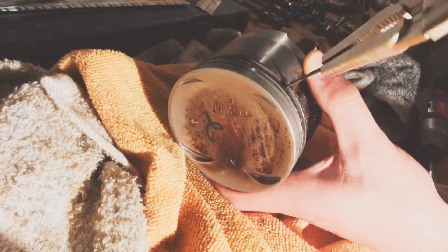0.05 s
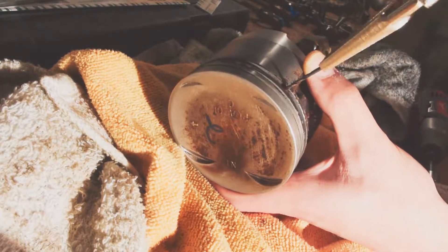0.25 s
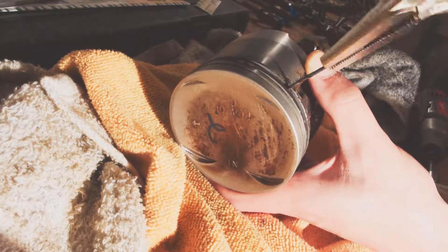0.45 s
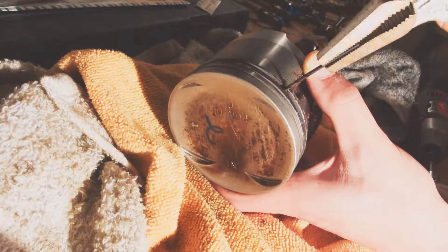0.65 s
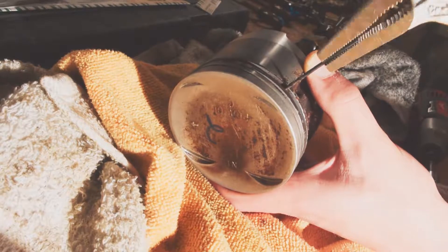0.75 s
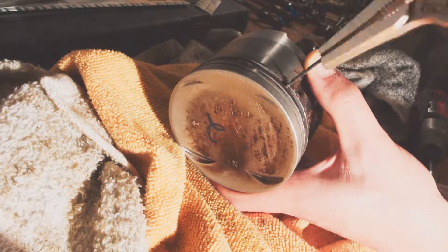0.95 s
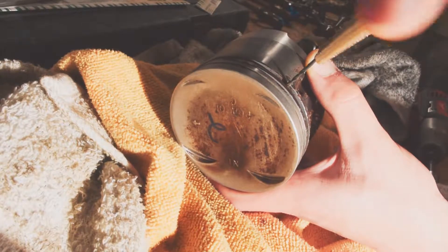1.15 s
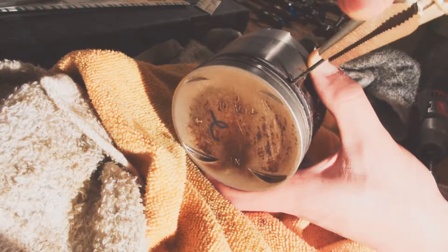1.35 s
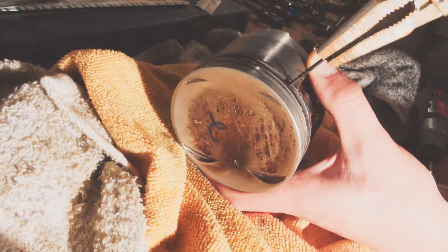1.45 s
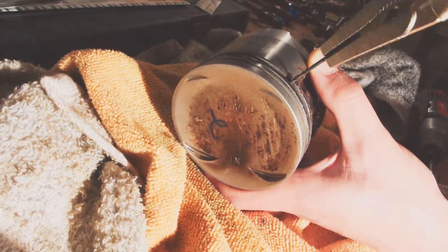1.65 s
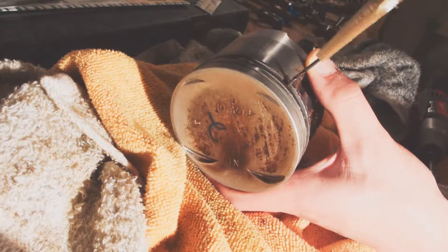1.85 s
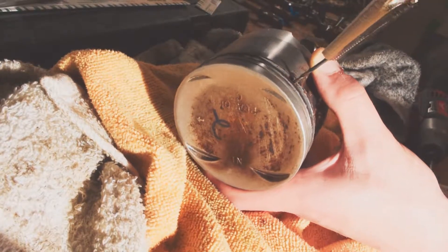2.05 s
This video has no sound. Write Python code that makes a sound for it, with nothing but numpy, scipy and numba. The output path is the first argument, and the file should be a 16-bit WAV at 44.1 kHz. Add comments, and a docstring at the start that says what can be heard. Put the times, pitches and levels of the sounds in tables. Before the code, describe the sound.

Small metal bit ticking and snapping against hard carbon, with short gritty scrapes.

```python
"""A small drill bit, gripped in pliers, is twisted by hand in the carbon-packed oil hole of a piston.
Its edges scrape, catch and snap free by stick-slip friction: each release rings the bit briefly,
cracks carbon and knocks the hand-damped piston. Hand and piston rustle softly on a towel.
A close microphone with a limiter hears it in a workshop with a faint tail, air noise and a low hum."""
import sys
import numpy as np
from scipy import signal
from scipy.fft import rfft, irfft
from scipy.io import wavfile
from scipy.ndimage import uniform_filter1d, minimum_filter1d
from numba import njit

SR = 44100
rng = np.random.default_rng(int(sys.argv[2]) if len(sys.argv) > 2 else 0)


def wav_out(sig):
    """Save sig, one row per channel (or a flat mono array), as 16-bit PCM at SR to the path in sys.argv[1]."""
    wavfile.write(sys.argv[1], SR, np.round(np.clip(np.atleast_2d(sig).T, -1, 1) * 32767).astype(np.int16))


N = 92610

# Air noise. Each row: frequency in Hz, relative density in dB.
AIR_SPECTRUM = [(20, -30), (35, -13), (55, -9), (85, -12), (150, -8), (250, -9), (500, -12.5),
                (1100, -16.5), (1800, -18.5), (6400, -21), (15500, -24)]
# Stereo width of the air. Each row: frequency in Hz, side against mid in dB.
AIR_WIDTH = [(50, -10), (150, -16.5), (600, -11.5), (3000, -7.5), (14000, -4.5)]
# Wavering of the low hum. Each row: time in seconds, level in dB.
HUM_LEVELS = [(0, -59), (.2, -67.5), (.36, -58.5), (.51, -54.5), (.64, -57.5), (.72, -61.5), (.81, -56),
              (.9, -62), (1.7, -65.5), (2.1, -59.5)]
# Two shifts of the hand, one curve each. Each point: time in seconds, level in dB.
GRIP_SHIFTS = [
    [(0, -45.5), (.03, -59), (.07, -64), (.12, -48.5), (.2, -73)],
    [(1.68, -77), (1.74, -56.5), (1.81, -62), (1.86, -78)],
]
# Their rustle. Each row: frequency in Hz, relative density in dB.
GRIP_SPECTRUM = [(40, -29), (90, 10.5), (170, 4), (380, 2), (600, -26.5), (1000, -9), (3000, -24)]
# Scraping, one curve for each twist. Each point: time in seconds, level in dB.
SCRAPE_STROKES = [
    [(0, -53), (.04, -56), (.08, -52.5), (.106, -47), (.122, -51)],
    [(.91, -72), (.945, -52.5), (.97, -43), (.982, -58.5), (1.025, -52.5), (1.06, -80)],
    [(1.16, -56), (1.198, -59.5), (1.222, -44.5), (1.252, -50), (1.272, -43), (1.286, -43), (1.298, -45.5),
     (1.318, -75)],
    [(1.72, -58.5), (1.748, -43.5), (1.77, -46.5), (1.795, -47), (1.815, -40.5), (1.83, -35), (1.85, -40)],
]
# Crumbling carbon. Each row: frequency in Hz, relative density in dB.
GRIT_SPECTRUM = [(300, -3), (1500, -2.5), (2300, -7), (3200, 5.5), (4000, 4.5), (4900, 5.5), (6000, 3),
                 (7300, 2.5), (9000, -3), (11000, -14), (16000, -13)]
# Joint modes of piston, bit and pliers. Each row: frequency in Hz, relative level in dB, T60 in seconds.
METAL_MODES = [ (1120, -52.5, 0.65), (1652, -24, 0.021), (3250, -11.5, 0.02), (3627, -18.5, 0.04),
               (4010, -21.5, 0.02), (4480, -13, 0.044), (4745, -14.5, 0.031), (4920, -11, 0.036),
               (6030, -34, 0.048), (6950, -6, 0.02), (7180, -20.5, 0.04), (8110, -7, 0.021),
               (9320, -10, 0.0083), (2665, -25, .11), (12340, -26, .09), ]
# The bit snaps free. Each row: start in seconds, ring frequency in Hz, ring level in dB,
# ring T60 in seconds, knock gain in dB, corner frequency of the contact in Hz.
SNAP_EVENTS = [ (.1128, 3540, -25, 0.0065, -38, 4200), (.1150, 4660, -22, 0.0059, -17.5, 4400),
               (.1175, 3900, -31, 0.0058, -29, 4500), (.1231, 6400, 6, .014, -5, 17000),
               (.1232, 12400, -9, .008, -16, 17000), (1.0738, 3700, -37, 0.023, -57, 4000),
               (1.0780, 3730, -37, .014, -29.5, 4300), (1.0834, 3970, -41, 0.014, -34, 4230),
               (1.0882, 3560, -28, 0.0094, -25, 5600), (1.0922, 7610, -26.5, 0.012, -28.5, 8600),
               (1.0936, 3190, -26.5, 0.016, -25, 8400), (1.2042, 3600, -53, 0.024, -31, 4820),
               (1.22, 4800, -37, .01, -34, 6500), (1.224, 4770, -33, 0.016, -43, 7500),
               (1.2375, 5000, -44, .01, -33.5, 6500), (1.2625, 4900, -38, 0.019, -36, 7400),
               (1.2831, 5600, -29, 0.014, -32.5, 7600), (1.3210, 7160, -13.5, 0.023, -18.5, 7800),
               (1.3227, 4700, -16, .013, -23, 7000), (1.3275, 4950, -20, .009, -21, 8500),
               (1.3301, 7700, -17.5, 0.011, -22, 7000), (1.8268, 3960, -18, 0.025, -23.5, 9600),
               (1.8427, 4830, -9.5, 0.0055, -17, 7300), ]
# Breaking carbon. Each row: frequency in Hz, relative density in dB.
CRACK_SPECTRUM = [(150, -32), (500, -13.5), (1200, -12), (2200, -13.5), (3300, 4), (5500, 1), (8000, -3.5),
                  (11000, 3.5), (16000, -3.5)]
# The piston jolts under the harder snaps. Each row: start in seconds, frequency in Hz, level in dB.
PISTON_JOLTS = [(.1232, 1026, -21), (1.0882, 1720, -37.5), (1.3215, 970, -31.5), (1.3275, 750, -35)]
# Workshop reflections. Each row: frequency in Hz, relative level in dB.
ROOM_SPECTRUM = [(300, 9), (1100, 0.5), (2000, -2.5), (3500, 4.5), (4700, 6), (5700, -4), (6600, 0),
                 (7500, 5), (10000, -1), (15000, -5)]

TIME = np.arange(N) / SR


def amp(db):
    """Decibels to amplitude ratio."""
    return 10 ** (np.asarray(db) / 20)


def unit(x):
    """Scale to an rms of 1."""
    return x / np.sqrt(np.mean(x ** 2))


def decay(t60):
    """Exponential damping: 60 dB lost in t60 seconds."""
    return np.exp(-np.log(1000) * TIME / t60)


def envelope(curves):
    """Sum of (seconds, dB) curves as amplitudes, each silent outside its span."""
    return sum(amp(np.interp(TIME, *np.array(curve).T, left=-np.inf, right=-np.inf)) for curve in curves)


def convolve(x, response):
    """A linear system convolves its input with its impulse response."""
    return signal.fftconvolve(x, response)[:N]


def colour(x, spectrum):
    """Minimum-phase filter that follows (Hz, dB) points."""
    hz, db = np.array(spectrum).T
    log_hz = np.log(np.fft.rfftfreq(N, 1 / SR) + 1)
    log_gain = np.log(amp(np.interp(log_hz, np.log(hz), db)))
    cepstrum = irfft(log_gain, N)
    cepstrum[1:N // 2] *= 2  # folding onto positive time makes the filter causal
    cepstrum[N // 2 + 1:] = 0
    return convolve(x, irfft(np.exp(rfft(cepstrum)), N))


def noise(spectrum):
    """Coloured Gaussian noise with an rms of 1."""
    return unit(colour(rng.standard_normal(N), spectrum))


def drift(points):
    """Slow fluctuation: straight lines between random values."""
    return np.interp(np.arange(N), np.linspace(0, N, points), rng.standard_normal(points))


def lowpass(x, corner_hz, order):
    """Butterworth roll-off above the corner."""
    return signal.sosfilt(signal.butter(order, corner_hz, fs=SR, output="sos"), x)


def air():
    """Steady air noise; an independent side signal partly decorrelates left and right."""
    mid = noise(AIR_SPECTRUM)
    side = colour(noise(AIR_SPECTRUM), AIR_WIDTH)
    return amp(-53) * np.array([mid + side, mid - side])


def hum(low_hz=58, wander_hz=2.61, mains_hz=120):
    """Slow modulation: a low hum wavers in pitch and level, a faint mains tone in level alone."""
    pitch_hz = low_hz + wander_hz * drift(points=14)
    low_tone = unit(np.sin(2 * np.pi * np.cumsum(pitch_hz) / SR))
    mains = unit((1 + .5 * drift(points=20)) * np.sin(2 * np.pi * mains_hz * TIME))
    return envelope([HUM_LEVELS]) * low_tone + amp(-68) * mains


def grip():
    """Soft friction: hand and piston settle on the towel with a low rustle."""
    return envelope(GRIP_SHIFTS) * noise(GRIP_SPECTRUM)


def scrape(metal, grains_per_s=3500):
    """Ploughing friction: the edges crumble carbon in random impulses, heard directly and via the metal."""
    effort = envelope(SCRAPE_STROKES)
    sizes = amp(-np.minimum(rng.exponential(size=N), 5))  # grains differ by up to 5 dB
    signs = np.sign(rng.standard_normal(N))
    grains = unit((rng.random(N) < grains_per_s / SR) * sizes * signs)
    grit = unit(colour(grains, GRIT_SPECTRUM)) * effort
    ring = convolve(grains * effort, metal / np.linalg.norm(metal))
    ring_gain = amp(-6)
    return (grit + ring_gain * ring) / np.hypot(1, ring_gain)


def metal_response():
    """Modal superposition: the held metal answers a tap with damped sines, here of alternating sign."""
    return sum((-1) ** k * amp(db) * decay(t60) * np.sin(2 * np.pi * hz * TIME)
               for k, (hz, db, t60) in enumerate(METAL_MODES))


def snaps(metal, attack_s=0.00004, chatter_rad=.45, chatter_hz=450):
    """Stick-slip: each release rings the bit, pitched by how it is wedged, and knocks the piston."""
    out = np.zeros(N)
    attack = 1 - np.exp(-TIME / attack_s)
    crumble = noise(CRACK_SPECTRUM)
    crack_envelope = amp(-3) * decay(t60=.018)
    chatter = chatter_rad * unit(lowpass(rng.standard_normal(N), chatter_hz, order=2))
    for start, ring_hz, ring_db, ring_t60, knock_db, corner_hz in SNAP_EVENTS:
        shift = rng.integers(N)  # each snap takes its own stretch of noise
        crack = np.roll(crumble, shift) * crack_envelope
        # A softer contact passes less treble; the tiny offset prevents underflow.
        knock = amp(knock_db) * lowpass(metal + crack + 1e-18, corner_hz, order=4)
        phase = 2 * np.pi * ring_hz * TIME + np.roll(chatter, shift)
        ring = amp(ring_db) * attack * decay(ring_t60) * np.sin(phase)
        onset = int(start * SR)
        out[onset:] += (ring + knock)[:N - onset]
    return out


def jolts(t60=0.014):
    """Heavy damping: the hand stops each jolt of the piston at once, leaving a dull knock."""
    out = np.zeros(N)
    for start, hz, db in PISTON_JOLTS:
        knock = amp(db) * decay(t60) * np.sin(2 * np.pi * hz * TIME)
        onset = int(start * SR)
        out[onset:] += knock[:N - onset]
    return out


def workshop(direct, tail_db=-26, bench_db=-20.5):
    """Reverberation: quick reflections from the bench and a faint diffuse tail join the direct sound."""
    tail = unit(noise(ROOM_SPECTRUM) * decay(t60=.95))
    bench = unit(noise(ROOM_SPECTRUM) * decay(t60=0.098))
    reflections = (amp(tail_db) * tail + amp(bench_db) * bench) / np.sqrt(N)
    return direct + convolve(direct, reflections)


def scene():
    """Superposition: the handwork sounds in the workshop over air noise and hum."""
    metal = metal_response()
    handwork = snaps(metal) + jolts() + scrape(metal) + grip()
    return workshop(handwork) + air() + hum()


@njit
def limiter_gain(peak, ceiling, release_s):
    """Peak limiting: the gain drops at once under a peak and recovers exponentially."""
    gain, held = np.empty(len(peak)), 1.
    for i in range(len(peak)):
        recovered = held + (1 - held) / (release_s * SR)
        held = min(recovered, ceiling / (peak[i] + 1e-9))
        gain[i] = held
    return gain


def record(dry, top_hz=15900):
    """Limiting of level and bandwidth: the loudest snap is held down and the top is cut steeply."""
    peak = np.abs(dry).max(axis=0)
    gain = limiter_gain(peak, ceiling=float(amp(-1.3)), release_s=0.11)
    smooth_gain = uniform_filter1d(minimum_filter1d(gain, size=31), size=31)
    top_cut = signal.ellip(10, .1, 80, top_hz, fs=SR, output="sos")
    return signal.sosfilt(top_cut, dry * smooth_gain)


dry = scene()
out = record(dry)
wav_out(out)
```